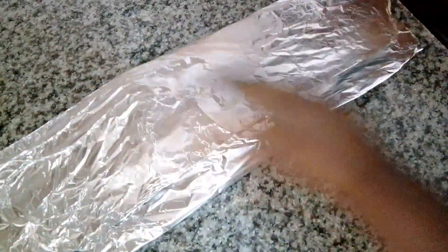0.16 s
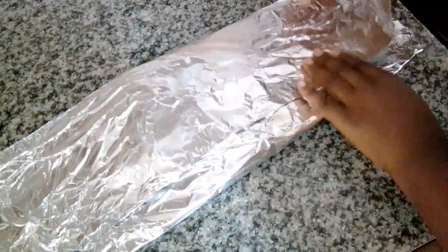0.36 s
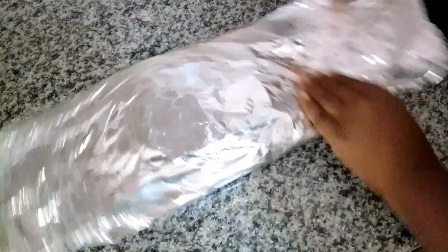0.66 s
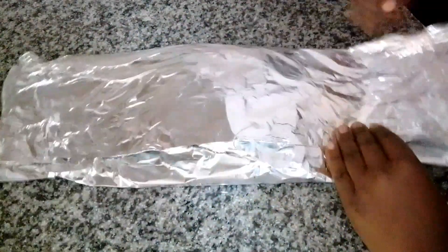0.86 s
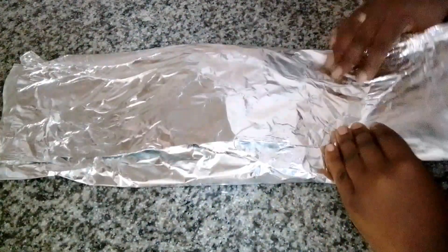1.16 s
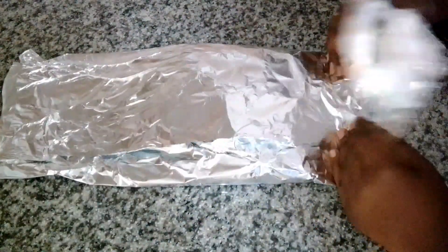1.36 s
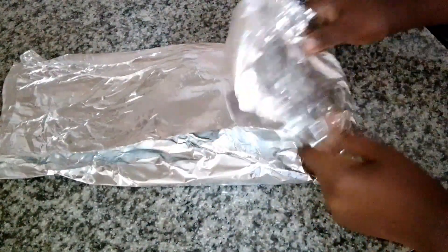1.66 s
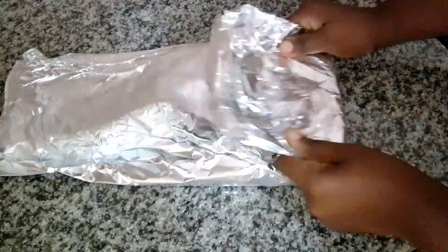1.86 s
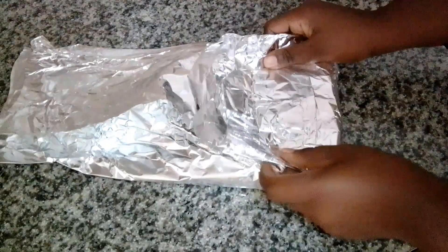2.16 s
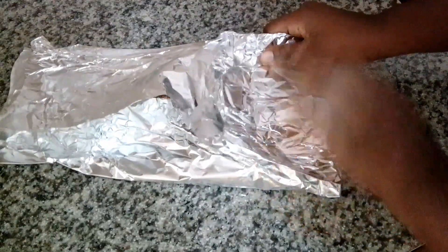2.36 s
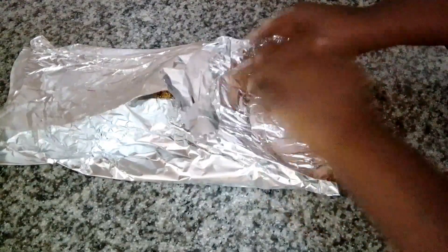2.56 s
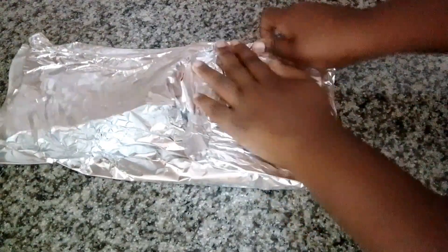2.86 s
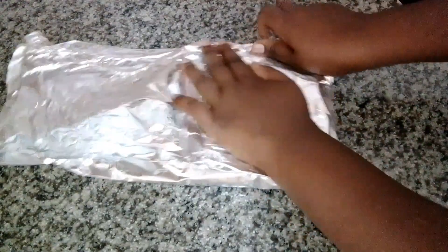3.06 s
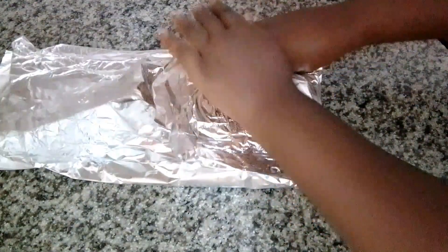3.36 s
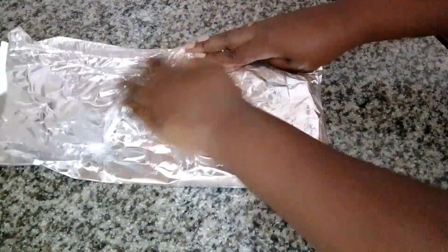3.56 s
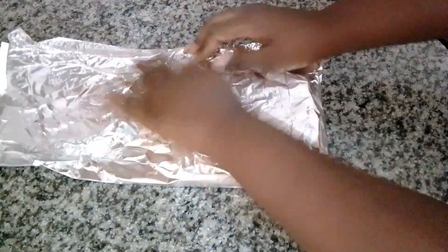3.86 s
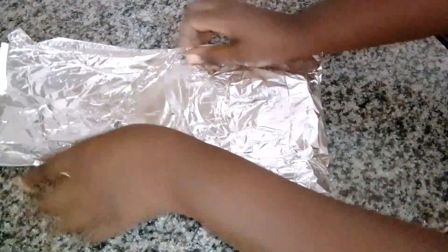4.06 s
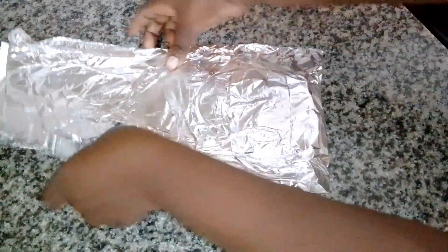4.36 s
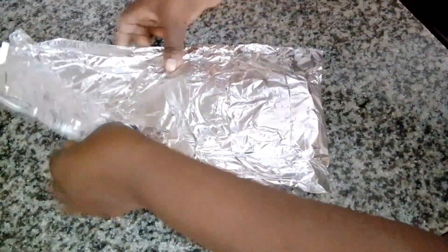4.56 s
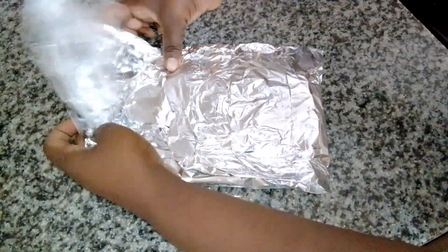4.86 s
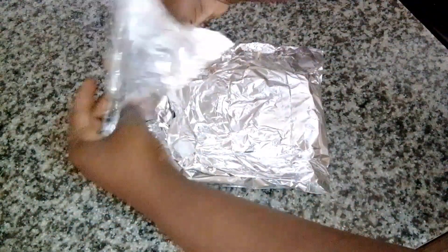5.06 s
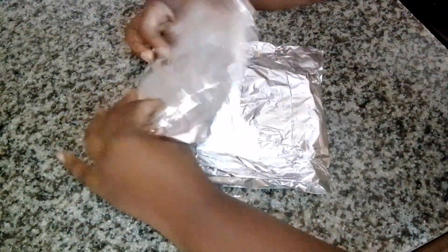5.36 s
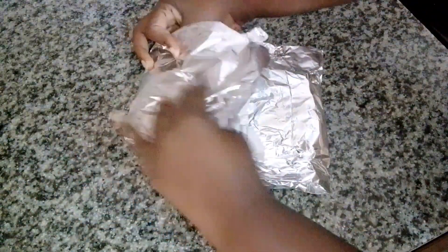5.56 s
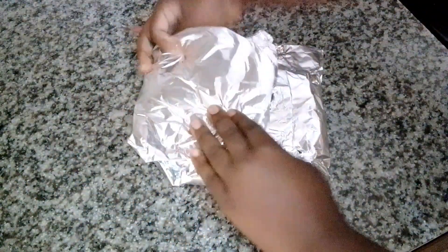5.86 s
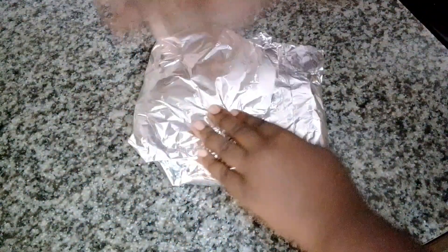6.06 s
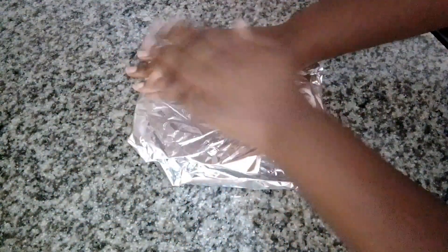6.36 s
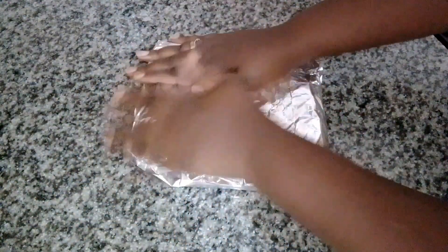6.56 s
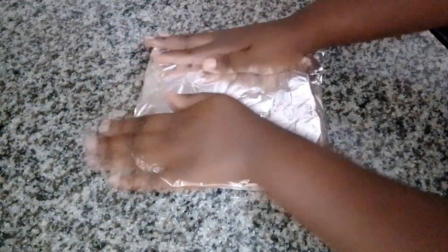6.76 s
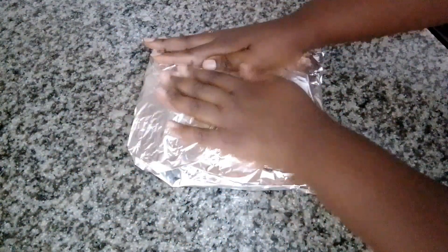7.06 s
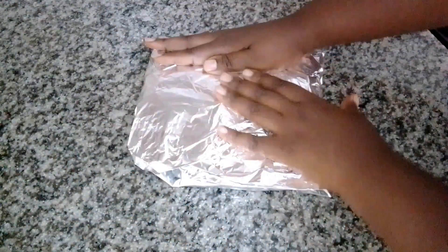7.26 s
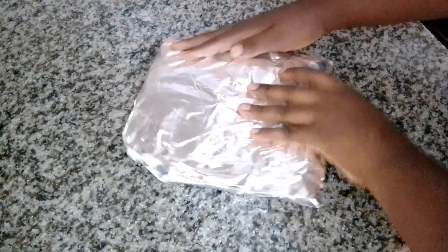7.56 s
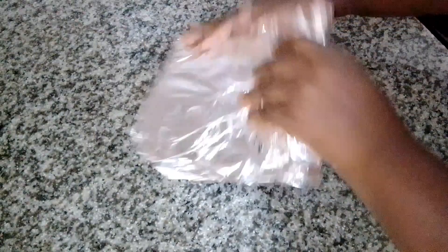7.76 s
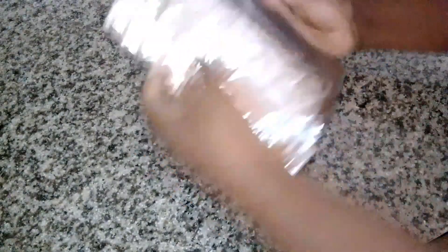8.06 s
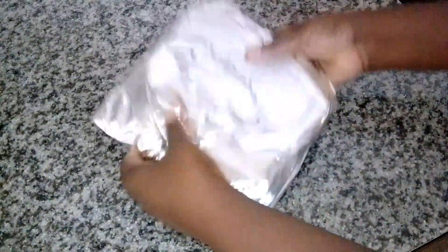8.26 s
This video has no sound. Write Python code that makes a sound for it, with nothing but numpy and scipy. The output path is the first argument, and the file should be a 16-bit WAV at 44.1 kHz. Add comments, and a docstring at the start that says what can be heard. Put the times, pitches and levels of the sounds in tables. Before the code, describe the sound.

Hands fold and flatten a sheet of foil on a stone counter, making bright, fitful crackles dotted with crisp clicks and hollow pops. A plastic bag then slides over it with a thin hiss, followed by a brief high squeak and a few light slaps and thumps. A last surge of crinkling comes as the bundle is picked up. It is heard up close, with a short indoor echo.

```python
"""Aluminium foil crinkles as two hands fold it and a plastic bag on a stone counter, pat the parcel flat
and lift it. Creases give way in little avalanches of clicks, wide panels buckle with duller pops, palms
slap the sheet and thud on the stone. The bag's film sticks and slips, sizzling and squeaking.
A small hard room rings behind it; the close microphone has a strong resonance near 8 kHz."""
import sys
import numpy as np
from scipy import signal
from scipy.fft import rfft, irfft
from scipy.io import wavfile
from scipy.ndimage import uniform_filter1d, minimum_filter1d

SR = 44100
rng = np.random.default_rng(int(sys.argv[2]) if len(sys.argv) > 2 else 0)


def log_audio(samples):
    """Write samples as a 16-bit WAV file to the path given in sys.argv[1]."""
    # one column per channel
    frames = np.atleast_2d(samples).T
    # limit to full scale, then quantise
    limited = np.clip(frames, -1, 1)
    pcm = np.round(limited * 32767).astype(np.int16)
    wavfile.write(sys.argv[1], SR, pcm)


N = 371322
T = np.arange(N) / SR


def undb(db):
    """Decibels to gain."""
    return 10 ** (np.asarray(db) / 20)


def colour(x, points, size=2048):
    """Minimum-phase EQ of unit power through (frequency [Hz], level [dB]) points."""
    hz, db = np.transpose(points)
    bin_hz = np.arange(size // 2 + 1) * SR / size
    gain = undb(np.interp(np.log(bin_hz + 1), np.log(hz), db))
    cepstrum = irfft(np.log(gain / np.sqrt(np.mean(gain ** 2))))
    cepstrum[1:size // 2] *= 2
    cepstrum[size // 2 + 1:] = 0
    return signal.oaconvolve(x, irfft(np.exp(rfft(cepstrum))))[:N]


def place(times, waves):
    """Mix one row of samples onto the timeline at each time."""
    at = (np.maximum(times, 0) * SR).astype(int)[:, None] + np.arange(waves.shape[1])
    return np.bincount(at.ravel(), waves.ravel(), N)[:N]


def even_out(x, size=2600):
    """Ride the level to unity over tens of milliseconds; the clicks keep their contrast."""
    power = uniform_filter1d(uniform_filter1d(x ** 2, size), size)
    return x / np.sqrt(np.abs(power) + np.mean(x ** 2) / 100)


def scattered_clicks(rate, spread_db):
    """Irregular click times at a moving rate, and their sizes: many small, few large."""
    due = np.cumsum(np.maximum(rate, 1)) / SR
    early, late, strength = rng.random((int(due[-1]), 3)).T
    times = np.interp(np.arange(len(strength)) + 2 * (early - late), due, T)
    return times, undb(spread_db * strength ** 2)


def avalanches(times, sizes, fade_s, after_db, scatter_db, count):
    """A first click sets off a run of others that die away; returns all times and sizes."""
    delay = 2 * (np.arange(count) + rng.random((len(times), count))) / count
    share = undb(after_db + scatter_db * 2 * rng.random(delay.shape)) * np.exp(-delay)
    delay[:, 0], share[:, 0] = 0, 1
    click_times = times[:, None] + delay * np.reshape(fade_s, (-1, 1))
    return click_times.ravel(), (sizes[:, None] * share).ravel()


def facet_bursts(times, sizes, ring_s, tint_db, size, count=9):
    """Each facet buckles: a short noise burst with the length and colour of its own modes."""
    age = T[:size] / (ring_s * 2 ** (2 * rng.random((len(times), 1)) - 1))
    waves = rng.standard_normal(age.shape) * (np.exp(-age) - np.exp(-10 * age))
    band = np.sqrt(np.linspace(0, 1, size // 2 + 1)) * (count - 1)
    blend = np.maximum(1 - np.abs(band - np.arange(count)[:, None]), 0)
    tint = undb(tint_db * (2 * rng.random((len(times), count)) - 1) @ blend)  # random EQ per burst
    waves = irfft(rfft(waves) * tint)
    waves *= np.sqrt(ring_s * SR / 2 / np.sum(waves ** 2, axis=1, keepdims=True))
    return place(times, waves * sizes[:, None])


def catch_and_yield(depth_db, size):
    """The sheet catches and yields: a level in dB that jumps at random, about every `size` samples."""
    spell = np.cumsum(rng.random(N) < 1 / size)
    steps = np.sqrt(12) * (rng.random(spell[-1] + 1) - .5)
    return depth_db * uniform_filter1d(steps[spell], size // 10)


# Spectrum of the still room: (frequency [Hz], level [dB])
ROOM_TONE_EQ = [(20, -18), (75, -18), (130, -14.5), (400, -9), (2000, -16), (16000, -40)]
def room_tone(level_db=-55.5):
    """Still air lays a faint, dark noise bed under everything."""
    return undb(level_db) * colour(rng.standard_normal(N), ROOM_TONE_EQ)


# Hand moves: press and turn the foil, fold its end (from 1.2 s), flatten the fold (2.7 s),
# draw the bag over it (4.4 s), smooth and pat (6.3 s), slide off and lift (7.5 s).
# (start [s], rise [s], hold [s], crinkle [dB], panel [dB], crackle rate [1/s], midrange [dB])
HAND_STROKES = [ (0, .015, 0.024, -31, -64.5, 1400, 7), (0.044, 0.058, 0.034, -15.5, -35.5, 2500, 2),
                (0.451, 0.061, 0.016, -12.5, -34, 1400, 0.5), (.6, 0.058, 0.043, -12, -34, 1400, 0.5),
                (.73, 0.027, 0.2, -15, -35.5, 1200, 0), (0.991, 0.039, .12, -26, -40.5, 500, 1),
                (1.199, .14, 0.063, -10.5, -33.5, 1600, 0.5), (1.43, 0.029, .3, -17.5, -35.5, 640, 3.5),
                (1.802, 0.021, .38, -15, -33, 890, 3.5), (2.259, 0.028, 0.25, -25, -45, 300, 1),
                (2.516, 0.078, 0.057, -19, -40, 500, 2.5), (2.719, 0.033, 0.058, -13.5, -33.5, 900, 2.5),
                (2.898, 0.037, 0.089, -15, -36.5, 820, 3.5), (3.061, 0.034, 0.12, -19, -36.5, 590, 2.5),
                (3.237, 0.047, 0.022, -14, -33.5, 700, 1.5), (3.364, .02, 0.12, -26, -45.5, 280, 0),
                (3.565, 0.042, 0.22, -14.5, -32.5, 1100, -0.5), (4.002, .012, 0.1, -16.5, -34.5, 700, 1.5),
                (4.171, 0.022, 0.063, -24.5, -43, 300, 1), (4.358, .01, 0.18, -25, -42.5, 300, 4),
                (4.47, .09, 0.28, -17.5, -38.5, 800, 1.5), (4.799, 0.068, 0.26, -15.5, -33.5, 900, -0.5),
                (5.209, 0.049, .035, -16, -32.5, 900, -4.5), (5.328, 0.059, .16, -16.5, -34, 900, -1),
                (5.579, 0.037, 0.075, -15.5, -35, 900, -5.5), (5.697, 0.065, .04, -13, -31.5, 900, -2),
                (5.87, 0.028, 0.071, -21, -38.5, 450, 1.5), (6.024, .01, 0.085, -25.5, -51, 222, -2),
                (6.17, .02, 0.069, -30, -55, 220, 0), (6.259, .015, 0.02, -17.5, -34, 900, 2),
                (6.401, .02, .09, -32, -76, 200, -2), (6.499, 0.021, 0.2, -18.5, -34, 700, 2.5),
                (6.738, 0.026, 0.11, -23, -38.5, 500, 4.5), (6.93, 0.024, 0.017, -31.5, -54.5, 500, -3),
                (7.009, .015, .15, -23, -41, 600, 1.5), (7.269, 0.0097, 0.023, -17.5, -31.5, 700, 2.5),
                (7.382, .02, .11, -29, -48, 400, 4), (7.495, 0.053, 0.14, -20, -40.5, 700, 3.5),
                (7.657, .11, .04, -16.5, -37, 900, 2.5), (7.85, 0.069, 0.098, -18, -32.5, 900, 2.5),
                (8.099, 0.018, 0.075, -26, -58.5, 200, 4.5), (8.211, 0.014, 0.27, -12.5, -33.5, 750, -0.5)]
def hands(sag_db_per_s=13, settle_db_per_s=140, rest_db=-39, rest_panel_db=-50.5):
    """The sheet sags under each push and settles on release; returns four control curves."""
    start, rise, hold, crinkle_db, panel_db, rate, midrange_db = np.transpose(HAND_STROKES)
    age = T[::20, None] - start
    held = np.maximum(age - rise, 0)
    fall_db = sag_db_per_s * np.minimum(held, hold) + settle_db_per_s * np.maximum(held - hold, 0)
    push = np.clip(age / rise, 0, 1) * undb(-fall_db)
    power = (push * undb(crinkle_db)) ** 2
    share = (power + 1e-12) / np.sum(power + 1e-12, axis=1, keepdims=True)
    effort = np.hypot(np.sqrt(power.sum(axis=1)), undb(rest_db))  # a resting hand still stirs the sheet
    flex = np.hypot(np.linalg.norm(push * undb(panel_db), axis=1), undb(rest_panel_db))
    return [np.interp(T, T[::20], control) for control in (effort, flex, share @ rate, share @ midrange_db)]


def crinkle(effort, rate, usual_rate=800, sliding_db=-4.5, sliding_top_hz=11500):
    """Small creases give way over the hiss of sliding sheet; the fewer they are, the more fitful."""
    times, sizes = scattered_clicks(rate, spread_db=14.5)
    crackle = facet_bursts(times, sizes, ring_s=0.0015, tint_db=2.5, size=256)
    lowpass = signal.butter(2, sliding_top_hz, fs=SR, output="sos")
    sliding = signal.sosfilt(lowpass, rng.standard_normal(N))
    sparseness = (usual_rate / rate) ** 0.25
    rustle = even_out(crackle) + sliding * undb(sliding_db) / sparseness
    flutter = undb(sparseness * catch_and_yield(2.5, size=440))
    return even_out(rustle * flutter) * effort


def dull_when_gentle(x, effort, edge_hz=10500, knee_db=-31):
    """A sheet that barely moves loses its top end."""
    soft = signal.sosfiltfilt(signal.butter(3, edge_hz, fs=SR, output="sos"), x)
    return soft + (x - soft) * effort / np.hypot(effort, undb(knee_db))


# Bright voice of the small creases, microphone resonance included: (frequency [Hz], level [dB])
CREASE_EQ = [(100, -67), (500, -29.5), (1500, -23), (2200, -23), (3200, -16.5), (4400, -14.5),
             (5500, -14.5), (6800, -6.5), (7700, -2.5), (8350, 0.5), (9300, -3.5), (10800, -10.5),
             (13500, -14.5), (15800, -16.5)]
def crease_tone(clicks, midrange_db):
    """Voice the creases: stiff foil lifts their midrange, limp film thins it."""
    midrange = signal.sosfilt(signal.butter(1, [2200, 5200], "band", fs=SR, output="sos"), clicks)
    return colour(clicks + (undb(midrange_db) - 1) * midrange, CREASE_EQ)


# Body of the wide panels: (frequency [Hz], level [dB])
PANEL_EQ = [(60, -45), (130, -27), (230, -13), (480, -3.5), (800, -2), (1150, 1.5), (1550, 1.5), (2100, -6),
            (3500, -3), (8000, -35.5)]
def flexing_panels(flex, rate, slap, panel_share=.8):
    """Wide panels buckle with a lower voice than the creases; palm slaps take the same colour."""
    times, sizes = scattered_clicks(panel_share * rate, spread_db=12)
    buckles = facet_bursts(times, sizes, ring_s=0.0015, tint_db=4.5, size=384, count=20)
    return colour(even_out(buckles) * flex + slap, PANEL_EQ)


# A palm or fingers land on the sheet: (time [s], crackle [dB], fade [s], slap [dB], thud [dB])
PALM_HITS = [(0.045, -2, 0.011, -20, -51), (0.338, -13, .018, -35, -75), (3.441, -18, 0.0059, -30, -75),
             (3.617, -11, .008, -25.5, -50), (3.671, -28, 0.013, -22, -64), (4.011, -22, 0.0075, -29, -53),
             (4.116, -16, .005, -26, -65), (4.232, -35, 0.0086, -31.5, -72), (6.279, -7, 0.017, -29, -70),
             (6.525, -7, .016, -30, -59), (7.027, -1, .012, -15.5, -41), (7.277, -12, 0.017, -24, -45),
             (8.287, -4.5, 0.013, -30, -55)]
def palm_pats(landing_s=0.0027):
    """A palm settles, crushes many creases at once, slaps out the air and thuds on the stone."""
    onset, crackle_db, fade_s, slap_db, thud_db = np.transpose(PALM_HITS)
    times, sizes = avalanches(onset, undb(crackle_db), fade_s, after_db=-2.5, scatter_db=0, count=30)
    age = times.reshape(len(onset), -1) - onset[:, None]
    contact = np.clip((age + landing_s) / (2 * landing_s), 0, 1)
    crackle = facet_bursts(times, sizes * contact.ravel(), ring_s=0.0022, tint_db=0, size=320)
    times, sizes = avalanches(onset, undb(slap_db), .6 * fade_s, after_db=-3.5, scatter_db=6.5, count=12)
    slap = facet_bursts(times, sizes, ring_s=0.0021, tint_db=5.5, size=512)
    t = T[:SR // 2]
    low_band = signal.butter(3, [62, 112], "band", fs=SR, output="sos")
    stone = signal.sosfilt(low_band, rng.standard_normal((len(onset), len(t))))
    thud = stone / stone.std() * (np.exp(-t / 0.041) - np.exp(-t / 0.0031))
    return crackle, slap, place(onset, undb(thud_db)[:, None] * thud)


# Sharp accents from single creases: (time [s], level [dB])
CREASE_SNAPS = [(0.3379, -21), (0.478, -6), (0.5445, -11), (0.567, -3.5), (0.9156, -13), (1.087, -5.5),
                (1.1217, -6), (1.196, -11.5), (1.7139, -6), (1.8046, -0.5), (2.174, -6.5), (2.3379, -13.5),
                (2.4055, -12.5), (2.4738, -15.5), (2.5754, -12), (2.728, -6.5), (3.1107, -10), (3.1686, -4),
                (3.5779, -7), (3.9813, -12.5), (4.011, -15), (4.1785, -7), (4.2458, -11), (4.361, -10),
                (4.5732, -19), (5.132, -5), (5.221, -2.5), (5.2565, -8), (5.6168, -1), (5.9883, -9.5),
                (6.0275, -11.5), (6.5082, -8.5), (6.654, -8), (6.71, -8), (7.2773, -1), (7.9163, -13),
                (8.2173, -13)]
def crease_snaps(pull_s=.0055):
    """A stiff crease snaps and pulls a few neighbours along."""
    onset, db = np.transpose(CREASE_SNAPS)
    times, sizes = avalanches(onset, undb(db), pull_s, after_db=-4, scatter_db=3.5, count=7)
    return facet_bursts(times, sizes, ring_s=0.0014, tint_db=-0.5, size=320)


# Wide panels that pop through: (time [s], level [dB], pitch [Hz])
PANEL_POPS = [(0.811, -16, 1489), (2.189, -22.5, 1316), (2.932, -20.5, 1290), (3.283, -21, 1440),
              (3.304, -15, 1462), (4.011, -21, 1120), (4.833, -24, 1362), (5.607, -23, 1463),
              (5.773, -14, 1230), (5.838, -18, 1421), (7.351, -25, 1320), (7.527, -20, 1388),
              (7.617, -21, 1597), (7.684, -14.5, 1342)]
def panel_pops(attack_s=0.00065, decay_s=0.0031):
    """A wide panel flips over: one dull burst in a broad band around its pitch."""
    out = np.zeros(N)
    t = T[:SR // 25]
    envelope = np.exp(-t / decay_s) - np.exp(-t / attack_s)
    for onset, db, hz in PANEL_POPS:
        band = signal.butter(2, [hz / 1.33, hz * 1.2], "band", fs=SR, output="sos")
        flip = signal.sosfilt(band, rng.standard_normal(len(t)) * envelope)
        out += place(np.array([onset]), undb(db) * flip[None] / np.abs(flip).max())
    return out


# Fader curve of the bag's film sliding over itself: (time [s], level [dB])
BAG_SLIDE = [(4.4, -64), (4.66, -20), (5.1, -27), (5.9, -49), (6.1, -58.5)]
def bag_sizzle():
    """Thin film sticks and slips very fast: a narrow, high sizzle."""
    band = signal.butter(2, [7700, 8900], "band", fs=SR, output="sos")
    sizzle = signal.sosfilt(band, rng.standard_normal(N))
    level_db = np.interp(T, *np.transpose(BAG_SLIDE))
    return sizzle / sizzle.std() * undb(level_db + catch_and_yield(3.83, size=200))


def finger_squeaks(start_s=6.567, length_s=.17, slips_per_s=150, pitch_hz=8300, swell_s=0.00051,
                   level_db=-3.5, fade_db_per_s=27, scatter_db=3):
    """Fingers stick and slip in one wipe over the taut bag: tiny, uneven squeaks that fade along it."""
    jitter, accent, detune = rng.standard_normal((int(length_s * slips_per_s) + 1, 3)).T
    age = np.abs(np.arange(len(jitter)) + .45 * jitter) / slips_per_s
    db = level_db - fade_db_per_s * age + scatter_db * accent
    t = T[:SR // 100]
    hz = pitch_hz * (1 + 0.05 * detune[:, None])
    envelope = t / swell_s * np.exp(1 - t / swell_s)
    return place(start_s + age, undb(db)[:, None] * np.sin(2 * np.pi * hz * t) * envelope)


def room(x, t60_s=0.52, tail_db=-8, near_db=-7, near_s=0.0051, hop=900):
    """Counter and hands scatter the sound at once; the walls add a short tail."""
    starts = np.arange(0, N, hop)
    grains = np.pad(x, (0, 2 * hop))[starts[:, None] + np.arange(2 * hop)] * signal.windows.cosine(2 * hop)
    t = T[:SR // 4]
    tail = undb(-60 * t / t60_s) * (1 - np.exp(-t / 0.00068))
    near = np.exp(-t / near_s)
    decay = np.hypot(undb(tail_db) * tail / np.linalg.norm(tail),
                     undb(near_db) * near / np.linalg.norm(near))
    paths = decay * rng.standard_normal((len(starts), len(t)))  # new for each grain: the sheet moves
    echoes = signal.fftconvolve(grains, paths, axes=1)
    return (x + place(starts / SR, echoes)) / np.sqrt(1 + np.sum(decay ** 2))


def scene():
    """Mono mix: foil and film go through the room; thuds and room tone stay dry."""
    effort, flex, rate, midrange_db = hands()
    crackle, slap, thud = palm_pats()
    rustle = dull_when_gentle(crinkle(effort, rate), effort)
    creases = crease_tone(rustle + crease_snaps() + crackle, midrange_db)
    panels = flexing_panels(flex, rate, slap) + panel_pops()
    air = room_tone()
    return (room(creases + panels + finger_squeaks() + bag_sizzle()) + thud + air)[None]


def record(dry, ceiling=1.18, size=65, top_hz=15850):
    """A fast soft limiter rounds the sharpest clicks; a steep low-pass cuts the top."""
    gain = (1 + (dry / ceiling) ** 4) ** -.25
    gain = uniform_filter1d(minimum_filter1d(gain, size), size)
    return signal.sosfilt(signal.ellip(12, .1, 80, top_hz, fs=SR, output="sos"), dry * gain)


dry = scene()
out = record(dry)
log_audio(out)
```